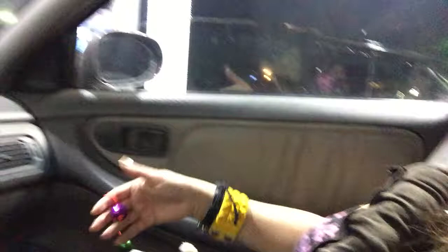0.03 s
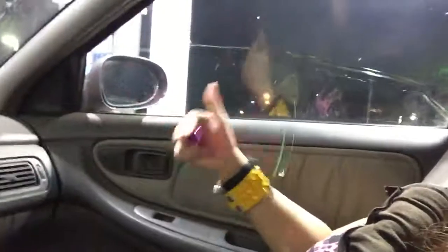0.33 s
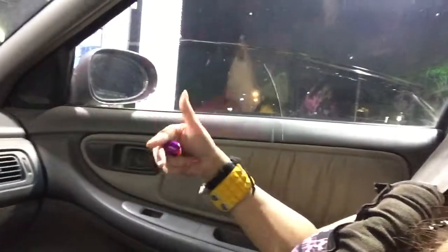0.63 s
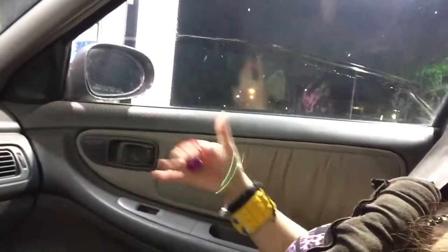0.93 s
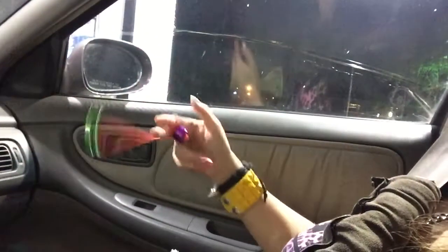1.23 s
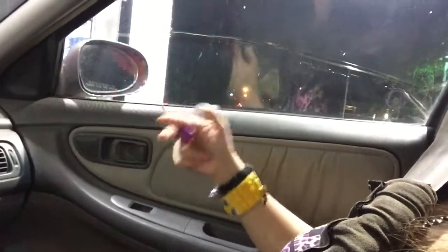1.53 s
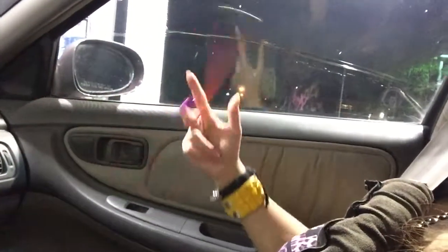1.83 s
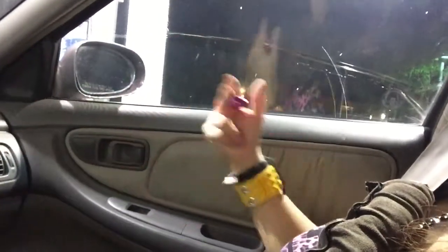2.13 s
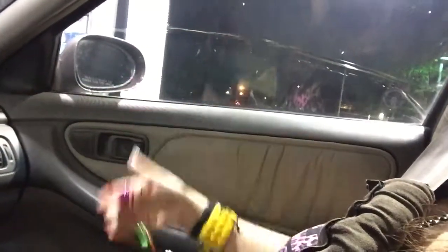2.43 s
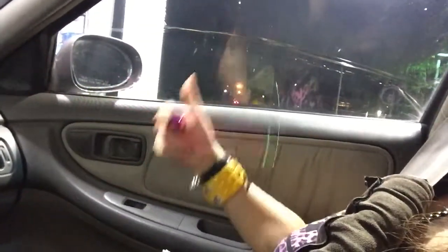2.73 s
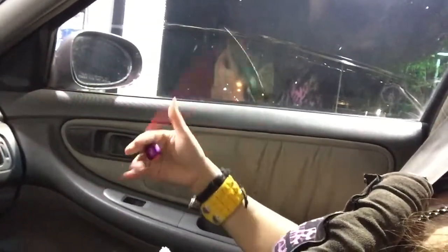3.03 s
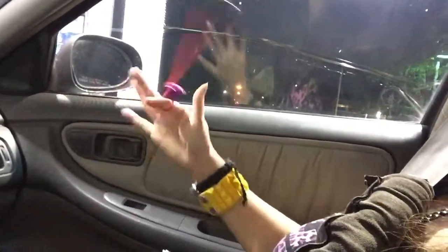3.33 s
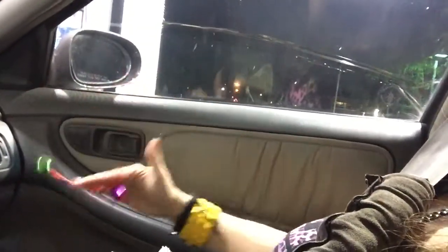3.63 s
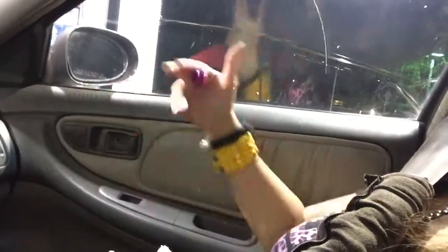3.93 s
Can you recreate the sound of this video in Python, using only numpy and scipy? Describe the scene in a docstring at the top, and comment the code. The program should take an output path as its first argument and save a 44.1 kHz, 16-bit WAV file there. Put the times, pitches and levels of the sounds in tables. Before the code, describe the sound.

Inside a slowly driving car, twirled metal beads make light ticks over a low rumble and hum. After a soft road thump, the beads clack sharply against each other and the door, close to the microphone.

```python
"""Road rumble and engine hum fill the cabin of a slowly moving car, with a faint, intermittent whine.
Metal beads on a string, twirled round a finger, tick and rattle as light contacts excite their modes.
The car thumps over a joint in the road, setting its panels into damped vibration. At the end the beads
clack together, strike the door trim hard and settle, while a hand brushes along it with friction noise."""
import sys
import numpy as np
from scipy import signal
from scipy.fft import rfft, irfft
from scipy.io import wavfile

SR = 44100
rng = np.random.default_rng(int(sys.argv[2]) if len(sys.argv) > 2 else 0)


def put_to_file(sound):
    """Save the sound as 16-bit audio at rate SR, in the file named by the first command-line argument."""
    columns = np.atleast_2d(sound).T  # one column per channel
    safe = np.clip(columns, -1, 1)
    whole_steps = np.round(safe * 32767)
    wavfile.write(sys.argv[1], SR, whole_steps.astype(np.int16))


N = 176400
T = np.arange(N) / SR

# light bead contacts: (time [s], level [dB], pitch [Hz], spread of partials [Hz], t60 [s], splash [dB])
TICKS = [(.275, -87.5, 6800, 510, .1, -3), (0.354, -67.5, 3315, 338.4, 0.078, -19),
         (.846, -84.5, 3620, 292, 0.096, -14), (1.0, -92, 3960, 400, .15, -20),
         (1.044, -72, 2090, 151.8, 0.078, -11), (1.094, -68, 3330, 396, 0.056, -14),
         (1.58, -90, 3580, 394, 0.23, -21.5), (1.929, -69, 2150, 69.5, 0.056, -18),
         (2.061, -70, 2130, 68.5, 0.057, -12), (2.229, -78, 2520, 352, 0.1, -14),
         (2.557, -77.5, 6840, 150, 0.073, -5), (2.878, -77, 2160, 78.8, .08, -8),
         (3.21, -91, 4200, 101, 0.13, -12), (3.248, -89, 5200, 500, .12, 3),
         (3.335, -80, 2130, 200, 0.18, -13), (3.436, -76.5, 1820, 247, 0.091, -26),
         (3.578, -62, 1870, 450, 0.097, -33), (3.614, -57.5, 4860, 350, 0.092, -25)]
# spectrum of a tick's splash and of the string's hiss: (frequency [Hz], level [dB])
SPARKLE_SPECTRUM = [(2000, -6.5), (13000, 2.5), (14600, 7), (15800, -6)]
# envelope of the beads' rattle: (time [s], level [dB])
RATTLE_LEVEL = [(0.13, -99), (1.7, -100.5), (2.3, -94), (3.0, -98), (3.4, -96)]
# bead-on-bead collisions: (time [s], level [dB], tilt [dB/octave], attack [s], t60 [s])
CLACKS = [(3.604, -77, 7, .003, .15), (3.62, -44.5, -3, 0.0031, 0.14), (3.6462, -34, -1, 0.0048, 0.13),
          (3.655, -29.5, -1, 0.003, 0.069), (3.749, -41.5, 13, 0.0025, 0.076),
          (3.8067, -38, 8.5, 0.0038, 0.064), (3.842, -62, 4, .006, 0.24), (3.88, -54, 0, 0.0025, 0.072)]
# spectrum of a clack: (frequency [Hz], level [dB])
CLACK_SPECTRUM = [(200, 9.5), (600, 2), (1100, 0), (2000, 1.5), (2700, 0), (3400, 0), (4400, 1),
                  (5500, -8.5), (8800, -8), (11000, -12), (16000, -18)]
# normal modes of the beads: (frequency [Hz], level [dB], t60 [s])
BEAD_MODES = [(2543, -5, 0.075), (2780, -6, 0.1), (3735, -0.5, 0.025), (4160, -6, 0.069),
              (4650, -3.5, 0.044), (6476, -24, 0.13), (8400, -16, 0.12)]
# the door trim, jolted by the bump and struck by the beads:
# (time [s], level [dB], tilt [dB/octave], crack [dB], attack [s], t60 [s])
KNOCKS = [(1.044, -53, -7, 6, 0.0037, .08), (3.149, -73, -14, 10, 0.014, 0.26),
          (3.339, -56, -9.5, 17, 0.022, 0.28), (3.7136, -16, -0.5, 15, 0.0042, 0.23),
          (3.7285, 1.5, -0.5, 16.5, 0.003, 0.1), (3.8827, -26, -5.5, 11, 0.0018, 0.11)]
# broadband response of the trim: (frequency [Hz], level [dB])
TRIM_SPECTRUM = [(75, -34), (130, -1.5), (300, -3), (600, 3.5), (850, -2), (1020, -2), (1600, 0),
                 (2600, 0.5), (3200, -8.5), (4600, -9.5), (6000, -23), (8700, -24), (10500, -34.5),
                 (16000, -33)]
# normal modes of the trim: (frequency [Hz], level [dB], t60 [s])
TRIM_MODES = [(257.4, 2, 0.18), (331.5, -2, 0.19), (611, 2.5, 0.16), (752, -14, 0.36), (1116, 0.5, 0.092),
              (1270, 6.5, 0.069), (1543, -6, 0.18), (1643, 3, 0.11), (1775, 2, 0.1), (1920, -13.5, 0.3),
              (2255, -8, 0.091), (2270, -14, 0.067), (2460, -6, 0.12), (2790, -12, 0.088),
              (3394, -9.5, 0.13), (4070, -19, 0.094), (4920, -7, 0.057)]
# the string sliding round the finger: (time [s], level [dB], attack [s], t60 [s])
SLIDES = [(2.06, -78.5, 0.044, 0.16), (2.291, -62, 0.041, 0.17), (2.40, -86, 0.064, 0.45),
          (2.56, -84, 0.0056, 0.19), (2.669, -82.5, .02, .35), (3.23, -85, 0.033, 0.13)]
# resonances of the string's small fittings: (frequency [Hz], bandwidth [Hz], level [dB])
FITTING_MODES = [(3270, 17, -10), (4030, 80, -11), (6420, 280, -8.5), (9380, 120, 2), (10770, 290, -5.5),
                 (12112, 340, -7), (14200, 110, 3), (14630, 250, -4), (15000, 300, 3.5)]
# the string snapping against the fingers: (time [s], level [dB], tilt [dB/octave], t60 [s])
SNAPS = [(1.098, -78.5, 7.5, 0.06), (2.766, -55, 5, 0.11)]
# spectrum of a snap: (frequency [Hz], level [dB])
SNAP_SPECTRUM = [(500, 19), (1300, -1.5), (2500, -9.5), (4400, -15), (5200, -44), (16000, -54)]
# thumps of the car body and door: (time [s], level [dB], pitch [Hz], attack [s], t60 [s])
THUMPS = [(3.1137, -24.5, 173.4, 0.0021, 0.071), (3.15, -37, 213, 0.0028, 0.1),
          (3.337, -38.5, 176, 0.012, 0.084), (3.7169, -8, 274, 0.00126, 0.022),
          (3.732, -25.5, 297, 0.0025, 0.043)]
# envelope of the hand brushing the door: (time [s], level [dB])
BRUSH_LEVEL = [(3.57, -88), (3.612, -52.5), (3.63, -46), (3.70, -47), (3.79, -37), (3.85, -48.5),
               (3.92, -48), (4.0, -47)]
# spectrum of the brushing: (frequency [Hz], level [dB])
BRUSH_SPECTRUM = [(30, -41), (60, -23), (110, 0.5), (200, -2), (300, -3.5), (430, -9), (600, -6.5),
                  (800, -16.5), (1200, -12.5), (1800, -23.5), (4000, -27.5), (6000, -42), (10000, -64),
                  (16000, -54)]
# road flutter and a rattle after the bump: (time [s], level [dB], centre frequency [Hz], length [s])
FLUTTERS = [(1.4, -79.5, 1530, 0.11), (3.163, -61.5, 1336, 0.045)]
# course of the engine hum: (time [s], pitch [Hz], level [dB])
ENGINE_HUM = [(0.13, 117, -55), (0.45, 123, -52), (0.85, 135, -47.5), (1.1, 136, -53.5), (1.3, 146, -48.5),
              (1.55, 151, -48), (1.75, 151, -57), (2.0, 148, -51), (2.4, 149, -60.5), (2.85, 146, -61.5),
              (3.05, 114, -58), (3.3, 111, -55.5), (3.6, 115, -61.5)]
# envelope of the road rumble: (time [s], level [dB])
ROAD_LEVEL = [(0.15, -60), (0.72, -59), (0.74, -63.5), (0.8, -57), (2.57, -61), (3.05, -59)]
# spectrum of the road rumble: (frequency [Hz], level [dB])
ROAD_SPECTRUM = [(18, -85.5), (30, -52), (59, -26), (85, -16), (105, -10), (139, -2), (173, -7),
                 (262, -4.5), (293, -10), (387, -12), (467, -15.5), (1430, -37), (1790, -68.5), (2370, -66),
                 (2600, -74), (3380, -62.5), (5720, -75.5)]
# swells of the faint whine: (time [s], level [dB], length [s])
WHINES = [(0.284, -88, 0.057), (0.382, -80, 0.094), (1.017, -87.5, 0.14), (1.26, -81.5, 0.056),
          (1.346, -83, 0.039), (1.575, -80.5, 0.058), (1.65, -89, 0.075), (1.901, -90.5, 0.046)]

ONSET_S, PANEL_LOW_CUT_HZ = 0.118, 99


def bead_ticks():
    """Impact excitation: each light touch gives a damped ping, rough partials and a splash of noise."""
    pings = splashes = 0
    for start, db, hz, spread_hz, t60, splash_db in TICKS:
        partials = sum(np.sin(2 * np.pi * ((hz + spread_hz * offset) * T + phase))
                       for offset, phase in rng.standard_normal(size=(4, 2)))
        tone = np.sin(2 * np.pi * hz * T) + from_db(-8 + 3.5 * drift(440)) * partials
        level = from_db(db) * envelope(start, attack=0.01, t60=t60)
        pings += level * tone
        splashes += level * from_db(splash_db) * rng.standard_normal(N)
    return pings + colour(splashes, SPARKLE_SPECTRUM)


def bead_rattle():
    """Shot noise: sparse random contacts drive narrow resonances of the beads into a diffuse rattle."""
    tilt_db_per_octave = -4.5
    grains = 0
    for hz in np.geomspace(1600, 5200, 18):
        ringing = soft_resonance(touches(per_s=20), hz, width_hz=45)
        grains += from_db(tilt_db_per_octave * np.log2(hz)) * ringing
    return unit_rms(grains) * from_db(in_time(RATTLE_LEVEL)[0]) * (T > ONSET_S)


def bead_clacks():
    """Hard collision: brief contact between beads gives a broadband click and a short metallic ring."""
    out = 0
    for start, db, tilt_db, attack, t60 in CLACKS:
        click = colour(burst(start, attack, t60), CLACK_SPECTRUM, tilt_db)
        out += from_db(db) * (click + from_db(-4.5) * struck(start, BEAD_MODES))
    return out


def trim_knocks():
    """Impulse response of the trim: a crack, its reflection off the window, scatter and panel modes."""
    echo_s, echo_db = 0.002324, 3
    low_cut = signal.butter(2, PANEL_LOW_CUT_HZ, "high", fs=SR, output="sos")
    out = 0
    for start, db, tilt_db, crack_db, attack, t60 in KNOCKS:
        crack = np.zeros(N)
        crack[int(start * SR)] = 1
        crack[int((start + echo_s) * SR)] += from_db(echo_db)
        impact = colour(from_db(crack_db) * crack + burst(start, attack, t60), TRIM_SPECTRUM, tilt_db)
        ringing = signal.sosfilt(low_cut, struck(start, TRIM_MODES))
        out += from_db(db) * (from_db(-13.5) * impact + from_db(-27.5) * ringing)
    return out


def string():
    """Sliding friction makes the string hiss and its fittings jingle; sudden tension makes it snap."""
    sliding = sum(from_db(db) * envelope(start, attack, t60) for start, db, attack, t60 in SLIDES)
    hiss = colour(rng.standard_normal(N), SPARKLE_SPECTRUM)
    jingle = sum(from_db(db) * soft_resonance(touches(per_s=1700), hz, width_hz)
                 for hz, width_hz, db in FITTING_MODES)
    snaps = sum(from_db(db) * colour(burst(start, attack=0.0024, t60=t60), SNAP_SPECTRUM, tilt_db)
                for start, db, tilt_db, t60 in SNAPS)
    return sliding * (from_db(-3.5) * unit_rms(jingle) + from_db(-17.5) * hiss) + snaps


def panel_thumps():
    """Damped free vibration: each jolt swings a body or door panel at one low frequency."""
    swings = sum(from_db(db) * ring(start, hz, attack, t60) for start, db, hz, attack, t60 in THUMPS)
    band = signal.butter(2, [PANEL_LOW_CUT_HZ, 1100], "band", fs=SR, output="sos")
    return -signal.sosfilt(band, swings)


def hand_brush():
    """Friction noise: the hand rubs the door with a dull, uneven sound."""
    rub = colour(rng.standard_normal(N), BRUSH_SPECTRUM)
    level_db = in_time(BRUSH_LEVEL)[0] + 2 * drift(60)
    return rub * from_db(level_db) * (T > BRUSH_LEVEL[0][0])


def road_flutter():
    """Band-limited noise: brief, soft mid-pitched rustles, a road flutter and a rattle after the bump."""
    out = 0
    for centre, db, hz, length in FLUTTERS:
        band = soft_resonance(rng.standard_normal(N), hz, width_hz=230)
        out += from_db(db) * swell(centre, length) * band
    return out * from_db(2 * drift(70))


def engine_hum():
    """Periodic vibration: the engine gives a fundamental and its octave, wavering in level and phase."""
    hz, level_db = in_time(ENGINE_HUM)
    phase = 2 * np.pi * np.cumsum(hz) / SR
    hum = 0
    for harmonic, harmonic_db in ((1, -3.476), (2, -9)):
        gain = from_db(level_db + harmonic_db + 6 * drift(14))
        hum += gain * np.sin(harmonic * phase + 0.61 * drift(12))
    return hum


def road_rumble():
    """Random excitation: tyres rolling on the road fill the cabin with low-frequency noise."""
    return colour(rng.standard_normal(N), ROAD_SPECTRUM) * from_db(in_time(ROAD_LEVEL)[0] + 5.5)


def faint_hiss():
    """Noise floor: steady white noise, softened by a first-order low-pass."""
    high_cut = signal.butter(1, 12000, fs=SR)
    return from_db(-93.5) * signal.lfilter(*high_cut, rng.standard_normal(N))


def whine():
    """Amplitude and frequency modulation: one thin, unsteady tone comes and goes."""
    swells = sum(from_db(db) * swell(centre, length) for centre, db, length in WHINES)
    flicker = from_db(4.2 * drift(77))
    hz = 2900 + 9 * drift(130)
    return swells * flicker * np.sin(2 * np.pi * np.cumsum(hz) / SR)


def struck(start, modes):
    """Modal superposition: one blow starts every mode, each with a random sign and a slight delay."""
    return sum(rng.choice([-1, 1]) * from_db(db)
               * ring(start + 0.00156 * rng.random(), hz, attack=0.00034, t60=t60)
               for hz, db, t60 in modes)


def ring(start, hz, attack, t60):
    """Damped oscillator: a single struck mode."""
    return np.sin(2 * np.pi * hz * (T - start)) * envelope(start, attack, t60)


def burst(start, attack, t60):
    """Diffuse reverberation: dense cabin reflections smear a contact into decaying noise."""
    return rng.standard_normal(N) * envelope(start, attack, t60)


def touches(per_s):
    """Poisson process: small random contacts of uneven strength."""
    return ((rng.random(N) < per_s / SR) + 1e-9) * rng.standard_normal(N)


def soft_resonance(x, hz, width_hz):
    """Cascaded resonators: two in series, the second twice as wide, give soft onsets; unit rms."""
    for bandwidth in (width_hz, 2 * width_hz):
        radius = np.exp(-np.pi * bandwidth / SR)
        feedback = [1, -2 * radius * np.cos(2 * np.pi * hz / SR), radius * radius]
        x = unit_rms(signal.lfilter([1, 0, -1], feedback, x))
    return x


def colour(x, spectrum, tilt_db=0):
    """Minimum-phase filter: imposes a spectrum, tilted per octave; white noise keeps its power."""
    hz, db = np.transpose(spectrum)
    octave = np.log2(np.maximum(np.arange(N + 1) * SR / (2 * N), 1))
    shape_db = np.interp(octave, np.log2(hz), db + tilt_db * np.log2(hz / hz[0]))
    octaves_below = np.clip(np.log2(hz[0]) - octave, 0, 4)
    gain = unit_rms(from_db(shape_db - 9.5 * octaves_below))
    cepstrum = irfft(np.log(gain + 1e-9))
    causal = np.r_[cepstrum[0], 2 * cepstrum[1:N]]  # folded so that nothing sounds before its cause
    return irfft(rfft(x, 2 * N) * np.exp(rfft(causal, 2 * N)))[:N]


def envelope(start, attack, t60):
    """Exponential decay: after a linear rise, the level falls 60 dB in t60 seconds."""
    age = T - start
    rise = np.clip(age / max(attack, 1e-4), 0, 1)
    return rise * from_db(-60 * np.clip((age - attack) / t60, 0, 4))


def swell(centre, length):
    """Gaussian envelope: a smooth rise and fall."""
    return np.exp(-(2 * (T - centre) / length) ** 2)


def drift(per_s):
    """Random modulation: straight lines between values of unit variance."""
    knots = rng.standard_normal(4000)
    return np.interp(T * per_s, np.arange(len(knots)), knots)


def in_time(rows):
    """Linear interpolation: each column of a curve at every sample."""
    times, *columns = np.transpose(rows)
    return [np.interp(T, times, column) for column in columns]


def from_db(db):
    """Decibel scale: level to amplitude ratio."""
    return 10 ** (np.asarray(db) / 20)


def unit_rms(x):
    """Normalisation to unit mean power."""
    return x / np.sqrt(np.mean(x ** 2) + 1e-20)


def scene():
    """Linear superposition: all sources add at the next seat, in one channel."""
    onset = np.clip((T - ONSET_S) / 0.0022, 0, 1)
    cabin = (engine_hum() + road_rumble() + faint_hiss()) * onset + whine()
    impacts = panel_thumps() + trim_knocks() + bead_clacks() + bead_ticks() + bead_rattle()
    return (cabin + impacts + road_flutter() + string() + hand_brush())[None]


def record(dry):
    """Saturation and band limiting: peaks are rounded, then the top is cut steeply."""
    cutoff_hz = 15900
    high_cut = signal.ellip(10, 0.1, 80, cutoff_hz, fs=SR, output="sos")
    return signal.sosfilt(high_cut, np.tanh(dry))


dry = scene()
out = record(dry)
put_to_file(out)
```